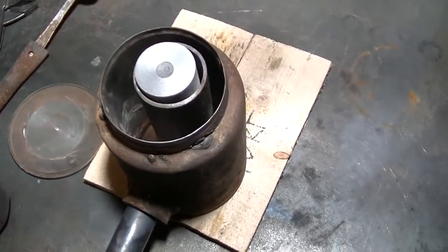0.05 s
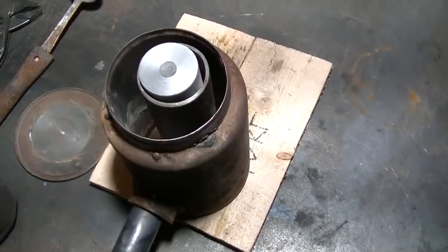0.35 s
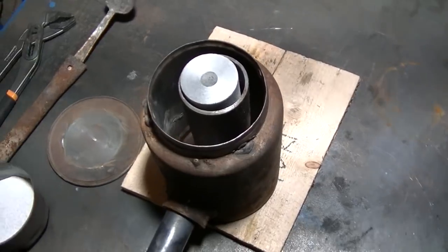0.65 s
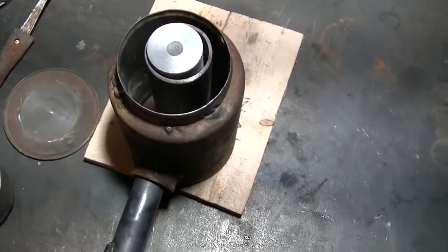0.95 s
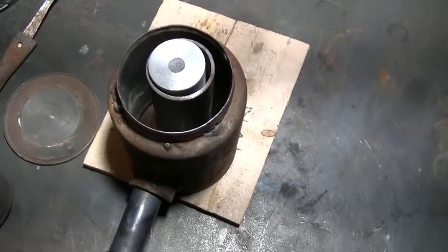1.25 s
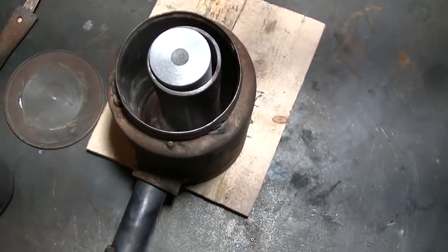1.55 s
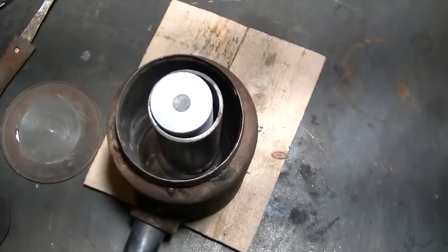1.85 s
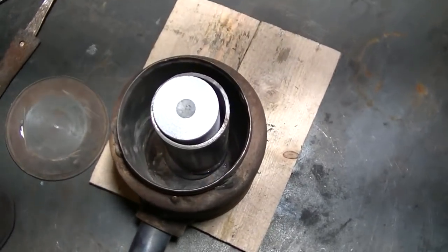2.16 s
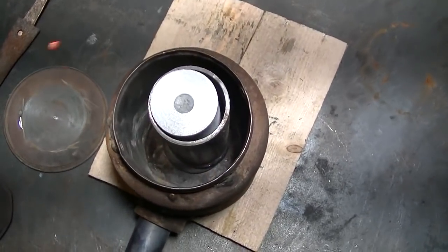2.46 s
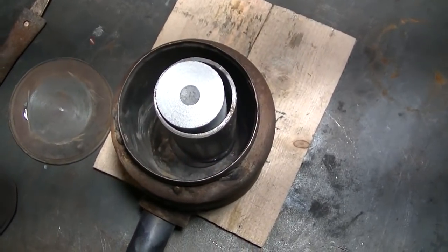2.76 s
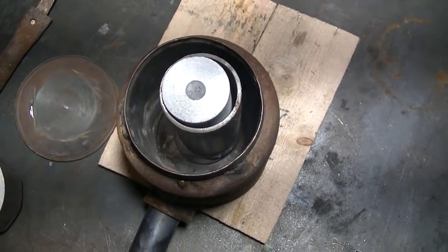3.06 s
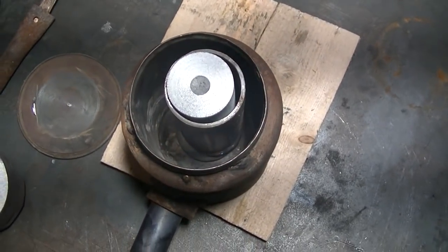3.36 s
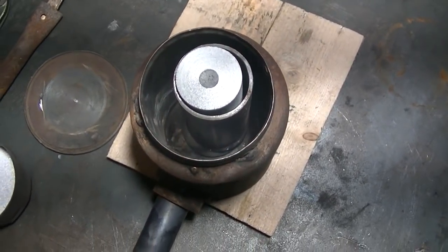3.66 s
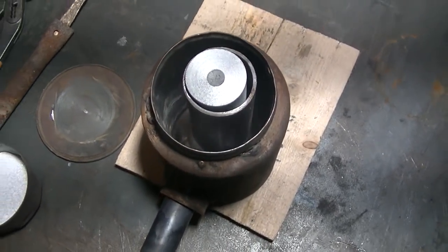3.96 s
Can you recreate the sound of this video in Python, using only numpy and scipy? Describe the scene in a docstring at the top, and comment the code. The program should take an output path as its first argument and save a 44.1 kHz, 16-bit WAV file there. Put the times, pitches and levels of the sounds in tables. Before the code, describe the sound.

Steady throbbing roar of a forced-air burner pot, whistling and sizzling with small spits.

```python
"""From the start, a blower forces air into a steel burner pot on a workshop bench: turbulence excites the
pot's resonances into a throbbing roar, under a breathy whistle, a fluttering hiss and a sizzle that spurts.
From half a second on, small spits break out. The microphone drifts from beside the pot to above its mouth,
arriving near 2.7 s as the whistle fades; near the end it drifts partway back and the whistle returns.
Throughout, nearby surfaces reflect the treble and a fast limiter holds the peaks."""
import sys
import numpy as np
from scipy import signal
from scipy.fft import rfft, irfft
from scipy.io import wavfile
from scipy.ndimage import uniform_filter1d, map_coordinates

SR = 44100
rng = np.random.default_rng(int(sys.argv[2]) if len(sys.argv) > 2 else 0)


def put_to_file(sound):
    """Save the sound as 16-bit audio at rate SR, in the file named by the first command-line argument."""
    columns = np.atleast_2d(sound).T  # one column per channel
    safe = np.clip(columns, -1, 1)
    whole_steps = np.round(safe * 32767)
    wavfile.write(sys.argv[1], SR, whole_steps.astype(np.int16))


N = 176400
HZ, TIME = np.fft.rfftfreq(N, 1 / SR), np.arange(N) / SR

# microphone position: time_s, overhead_fraction (0 beside the pot, 1 above its mouth)
MIC_PATH = [(0, 0.16), (.45, 0.083), (.9, 0.36), (1.3, 0.38), (1.6, 0.56), (2.0, 0.86), (2.7, 0.98),
            (3.3, 0.86), (3.65, 0.83), (4, 0.73)]
# resonances of pot, pipe and room: pitch_hz, width_hz, beside_db, above_db
MODES = [(190.3, 11.5, -46.5, -46), (254.9, 13.4, -42.5, -41.3), (295, 7.5, -48, -44.5),
         (349.3, 20.4, -38, -35), (379, 13, -36.5, -38.5), (439.6, 31, -42.5, -33), (467.4, 24, -42.5, -31),
         (510, 64, -38, -30.5), (567, 50, -31, -30), (609, 25, -35.5, -30), (671, 29, -36, -28.5),
         (731.4, 51.5, -23, -20), (778.7, 41, -23.5, -23), (841, 34, -27.5, -24.5), (898, 50, -42, -24.5),
         (967, 63, -30, -27.5), (1263, 50, -48, -36), (1348, 32, -39, -37.5), (1611, 134, -30, -32),
         (1766, 22, -34.5, -37.5), (1905, 31, -25.5, -35.5), (2112, 83, -31, -34.5),
         (2417, 110, -48, -36.5), (3446, 120, -53.5, -46.5), (3976, 83, -55, -47), (4560, 150, -39.5, -56),
         (5594, 450, -43.5, -44)]
# broad rush under the resonances: frequency_hz, beside_db_per_hz, above_db_per_hz
RUSH_SPECTRUM = [(20, -88, -88), (90, -95, -82), (139, -78.5, -73), (230, -64.5, -62), (395, -70, -79),
                 (750, -56, -57.5), (1180, -60, -62), (1450, -62.5, -78), (1810, -53.5, -70.5),
                 (2180, -75, -62.5), (2660, -73.5, -72), (4050, -97, -94), (16000, -125, -125)]
# whistle of the burner tube: time_s, pitch_hz, level_db
TUBE_WHISTLE = [(0, 2020, -19.5), (.35, 2010, -19.5), (.75, 1965, -22), (1.28, 2000, -21),
                (1.58, 1980, -25), (1.9, 2000, -33.5), (2.3, 2020, -29), (2.751, 2060, -30),
                (3.101, 2020, -33.5), (3.5, 1960, -37.5), (3.8, 1930, -23), (4, 1935, -27.5)]
# hiss of the air jet: frequency_hz, beside_db_per_hz, above_db_per_hz
JET_SPECTRUM = [(20, -110, -110), (1200, -82, -71), (2700, -77.5, -74.5), (3550, -82.5, -76.5),
                (5070, -95, -78), (5970, -80, -85), (6300, -96, -79), (7250, -83.5, -85.5),
                (9150, -86.5, -98), (10000, -96, -95), (11500, -100, -93), (13400, -95, -97),
                (15400, -105, -105)]
# narrow hiss of the nozzle: time_s, pitch_hz, level_db
NOZZLE_WHISTLE = [(0, 6710, -50), (.7, 6830, -52.5), (1.45, 6880, -47.5), (1.75, 6740, -48),
                  (2.15, 6780, -51), (2.8, 6620, -45.5), (3.15, 6670, -49.5), (4, 6760, -46)]
# upper resonance of the tube: time_s, level_db
UPPER_RING_ENVELOPE = [(0, -40.5), (.85, -43), (1.3, -45.5), (1.75, -52), (2.1, -49), (2.42, -59),
                       (2.68, -43), (2.95, -57), (3.2, -42), (3.42, -52), (3.65, -41.5), (4, -51)]
# sizzle in the hot pot: frequency_hz, level_db_per_hz
SIZZLE_SPECTRUM = [(20, -120), (3000, -86), (6500, -85), (8300, -79.5), (9000, -81), (10200, -79),
                   (11400, -89.5), (13300, -98), (15600, -105)]
# strength of the sizzle: time_s, gain_db
SIZZLE_ENVELOPE = [(0, -6), (.2, 0), (.4, -3), (.55, 1.5), (.71, -4), (.82, 1), (1.0, -0.5), (1.3, -3),
                   (1.57, -0.5), (1.92, 1), (2.0, -5.5), (2.39, -3.5), (2.5, 0.5), (2.85, 0), (3.0, -1.5),
                   (3.22, -1.5), (3.32, -1), (3.5, -5), (3.6, 2), (4, 2)]
# highest fizz: time_s, level_db
FIZZ_ENVELOPE = [(0, -58), (1.3, -60), (1.6, -55), (2.1, -62), (2.38, -58), (2.5, -49), (2.85, -54),
                 (3.2, -56), (3.4, -63), (4, -53)]
# spurts of sizzle: start_s, length_s, centre_hz, width_octaves, level_db
SPURT_EVENTS = [(0.047, 0.3, 9400, .1, -48.5), (0.728, 0.2, 9400, .14, -47), (1.3, 0.44, 8330, 0.038, -53),
                (2.39, .54, 7700, .07, -50), (3.14, 0.14, 10400, .14, -45),
                (3.5, 0.52, 10240, 0.078, -51.5)]
# single spits: start_s, level_db, centre_hz
SPIT_EVENTS = [(.525, -33, 4000), (.662, -37, 3500), (1.172, -32, 3720), (1.262, -40, 3500),
               (1.956, -37, 3000), (2.624, -33, 5000), (3.203, -35, 10500)]
# reflections from bench and nearby steel: beside_delay_ms, above_delay_ms, gain_ratio
ECHOES = [(1.48, 1.123, 0.1), (6.3, 5.7, 0.21), (9.4, 3.9, 0.16)]
# part that differs between left and right: frequency_hz, gain_db
SIDE_SPECTRUM = [(80, -20), (170, -30), (700, -35), (1300, -30), (2000, -24), (4000, -24), (6500, -24),
                 (9000, -39)]
# channel balance: frequency_hz, left_minus_right_db
CHANNEL_BALANCE = [(140, .1), (210, .45), (6500, .45), (8500, 0)]

# modulation depths, rms
ROAR_THROB_DB, HISS_THROB_DB, SIZZLE_THROB_DB = 1.12, 1.2, 1.96
ROAR_FLUTTER_DB, WHISTLE_FLUTTER_DB, HISS_FLUTTER_DB, SIZZLE_FLUTTER_DB = 0.58, 2, 0.7, 1.5


def amp(db):
    """Amplitude grows tenfold for every 20 dB."""
    return 10 ** (np.asarray(db) / 20)


def unit(x):
    """Normalisation to rms 1."""
    return x / np.sqrt(np.mean(x ** 2) + 1e-20)


def spectrum(table, column=1):
    """Frequency response from a dB column, interpolated over log frequency."""
    columns = np.transpose(table)
    return amp(np.interp(np.log(HZ + 1), np.log(columns[0] + 1), columns[column]))


def curve(points):
    """Linear interpolation of a control over time."""
    return np.interp(TIME, *np.transpose(points))


def bell(hz, octaves):
    """Gaussian passband over log frequency."""
    return np.exp(-.5 * (np.log2((HZ + 1) / hz) / octaves) ** 2)


def resonance(hz, half_width_hz):
    """Lorentzian peak: the gain is one half at half_width_hz from the centre."""
    return 1 / (1 + ((HZ - hz) / half_width_hz) ** 2)


def highpass(hz):
    """Response that falls 24 dB per octave below hz."""
    return HZ ** 4 / (HZ ** 4 + hz ** 4)


def colour(x, gain):
    """Filtering as multiplication of the spectrum."""
    return irfft(rfft(x) * gain, N)


def noise(gain):
    """White noise takes the spectral shape of its filter; rms 1."""
    return unit(colour(rng.standard_normal(N), gain))


def wander(rate_hz):
    """Low-pass noise: random drift, mostly slower than the rate; rms 1."""
    return noise(HZ / (HZ + 1) * resonance(0, rate_hz))


def turbulence():
    """Turbulent pressure as white noise of 0 dB per Hz."""
    return rng.standard_normal(N) * np.sqrt(SR / 2)


def airflow(table, overhead):
    """Directivity: the spectrum of flow noise depends on where the microphone is."""
    air = turbulence()
    beside = colour(air, spectrum(table, column=1))
    above = colour(air, spectrum(table, column=2))
    return (1 - overhead) * beside + overhead * above


def roar(overhead):
    """Turbulence drives each resonance; high ones tend to radiate sideways, low ones upwards."""
    out = airflow(RUSH_SPECTRUM, overhead)
    for hz, width_hz, beside_db, above_db in MODES:
        ring = noise(resonance(hz, 0.83 * width_hz))
        out += ring * amp(beside_db + (above_db - beside_db) * overhead)
    return out


def flow_flutter(rate_hz=43.2):
    """Irregular pulsation of the air flow, its swings bounded by saturation; rms 1."""
    return unit(np.tanh(.5 * noise(bell(rate_hz, octaves=1))))


def flame_throb(mean_hz=55, stray_hz=5):
    """The flame pulses as an oscillator with slight random frequency modulation; rms 1."""
    throb_hz = mean_hz + stray_hz * wander(rate_hz=13.5)
    return unit(np.sin(2 * np.pi * np.cumsum(throb_hz) / SR))


def whistle(track, half_width_hz):
    """Narrowband turbulence: a drifting tone whose amplitude and phase vary at random."""
    seconds, hz, db = np.transpose(track)
    phase = 2 * np.pi * np.cumsum(np.interp(TIME, seconds, hz)) / SR
    band = resonance(0, half_width_hz)
    in_phase = colour(rng.standard_normal(N), band)
    quadrature = colour(rng.standard_normal(N), band)
    tone = unit(in_phase * np.cos(phase) + quadrature * np.sin(phase))
    return tone * amp(np.interp(TIME, seconds, db))


def upper_ring():
    """A higher resonance of the burner tube, driven by noise, swells, wavers and fades."""
    ring = noise(resonance(hz=4220, half_width_hz=115))
    return ring * amp(curve(UPPER_RING_ENVELOPE) + wander(rate_hz=10))


def sizzle(crackles_per_s=3600, spread_db=5, fizz_db=-3.5, crackle_db=-5.5):
    """Shot noise in the hot pot: dense random impulses merge with a fine fizz, coming and going."""
    sizes = amp(spread_db * np.minimum(rng.exponential(1, N), 5)) * rng.choice([-1, 1], N)
    impulses = sizes * (rng.random(N) < crackles_per_s / SR)
    crackles = unit(impulses) * np.sqrt(SR / 2)  # 0 dB per Hz
    fizz = colour(amp(fizz_db) * turbulence() + amp(crackle_db) * crackles, spectrum(SIZZLE_SPECTRUM))
    return fizz * amp(curve(SIZZLE_ENVELOPE) + wander(rate_hz=13))


def top_fizz():
    """The highest noise band of the sizzle swells under an envelope of its own."""
    return noise(bell(hz=11900, octaves=0.18)) * amp(curve(FIZZ_ENVELOPE))


def sputter(ticks_per_s=140, decay_s=0.0025, level_db=-43):
    """The flame ticks faintly as a Poisson process, each tick a decaying burst of noise."""
    kicks = (rng.random(N) < ticks_per_s / SR) * rng.uniform(.3, 1, N)
    envelope = signal.lfilter([1], [1, -np.exp(-1 / (decay_s * SR))], kicks)
    bursts = envelope * rng.standard_normal(N)
    return amp(level_db) * unit(colour(bursts, bell(hz=3500, octaves=0.66)))


def spurts(edge_s=0.065):
    """Thin jets of sizzle: gated bands of noise, each narrow enough to have a pitch."""
    out = np.zeros(N)
    for start_s, length_s, hz, octaves, db in SPURT_EVENTS:
        gate = np.clip(np.minimum(TIME - start_s, start_s + length_s - TIME) / edge_s, 0, 1)
        out += amp(db) * gate * noise(bell(hz, octaves))
    return out


def spits(decay_s=0.011):
    """Transients out of the sizzle: puffs of noise with a sudden onset and exponential decay."""
    out = np.zeros(N)
    lowpass = 1 / (1 + (HZ / 11000) ** 8)
    for start_s, db, hz in SPIT_EVENTS:
        envelope = (TIME >= start_s) * np.exp(-abs(TIME - start_s) / decay_s)
        out += amp(db) * envelope * noise(bell(hz, octaves=0.36) * lowpass)
    return out


def workshop(x, overhead, room_db=-10, t60_s=0.28):
    """Treble reflections form a comb filter that moves with the microphone; brief reverberation follows."""
    treble = colour(x, highpass(hz=3260))
    out = x.copy()
    for beside_ms, above_ms, gain in ECHOES:
        delay_s = (beside_ms + (above_ms - beside_ms) * overhead) / 1000
        out += gain * map_coordinates(treble, [(TIME - delay_s) * SR], order=3, mode="wrap")
    tail = rng.standard_normal(N) * np.exp(-np.log(1000) * TIME / t60_s)
    return out + amp(room_db) * colour(treble, rfft(tail / np.linalg.norm(tail)))


def stereo_width(mid, kernel_decay_s=0.0064, ripple_db=1):
    """Mid-side stereo: a faint phase-shifted copy, uneven over frequency, adds left and subtracts right."""
    kernel = rng.standard_normal(N) * np.exp(-TIME / kernel_decay_s)
    ripple = amp(ripple_db) * rfft(kernel / np.linalg.norm(kernel)).real
    side = colour(mid, 1j * (1 + ripple) * spectrum(SIDE_SPECTRUM))  # in quadrature with mid
    left_gain = np.sqrt(spectrum(CHANNEL_BALANCE))
    return np.array([colour(mid + side, left_gain), colour(mid - side, 1 / left_gain)])


def scene():
    """Common amplitude modulation binds the sustained layers; the whistle has a flutter of its own."""
    overhead = np.clip(curve(MIC_PATH), 0, 1)
    flutter, throb = flow_flutter(), flame_throb()
    body = roar(overhead) * amp(ROAR_FLUTTER_DB * flutter)
    tube = whistle(TUBE_WHISTLE, half_width_hz=60) * amp(WHISTLE_FLUTTER_DB * flow_flutter())
    hiss = airflow(JET_SPECTRUM, overhead) + whistle(NOZZLE_WHISTLE, half_width_hz=230) + upper_ring()
    hiss *= amp(HISS_FLUTTER_DB * flutter)
    fizz = sizzle() + top_fizz() + spurts()
    fizz *= amp(SIZZLE_FLUTTER_DB * flutter + SIZZLE_THROB_DB * throb)
    burner = (body + tube) * amp(ROAR_THROB_DB * throb)
    burner += (hiss + sputter()) * amp(HISS_THROB_DB * throb)
    burner += fizz + spits()
    mid = colour(workshop(burner, overhead), highpass(hz=128))
    return stereo_width(mid)


def record(dry, ceiling=0.51, recovery_db_per_s=1500, cutoff_hz=15700):
    """Peak limiting: the gain drops at once and recovers in milliseconds; a low-pass limits the band."""
    over_db = 20 * np.log10(np.maximum(abs(dry).max(0) / ceiling, 1))
    recovery_db = TIME * recovery_db_per_s
    held_db = np.maximum.accumulate(over_db + recovery_db) - recovery_db
    limited = dry * amp(-uniform_filter1d(held_db, size=5))
    lowpass = signal.firwin(511, cutoff_hz, window=("kaiser", 9), fs=SR)
    return signal.oaconvolve(limited, lowpass[None], "same")


dry = scene()
out = record(dry)
put_to_file(out)
```